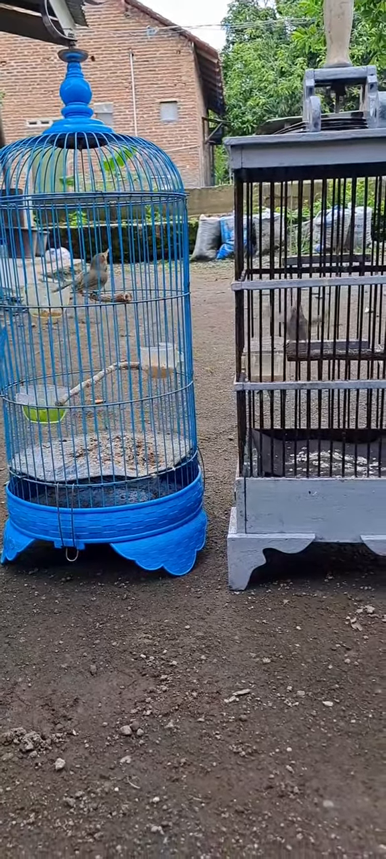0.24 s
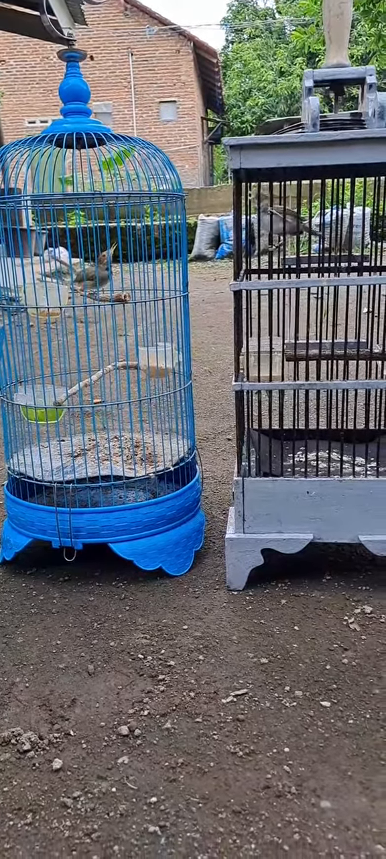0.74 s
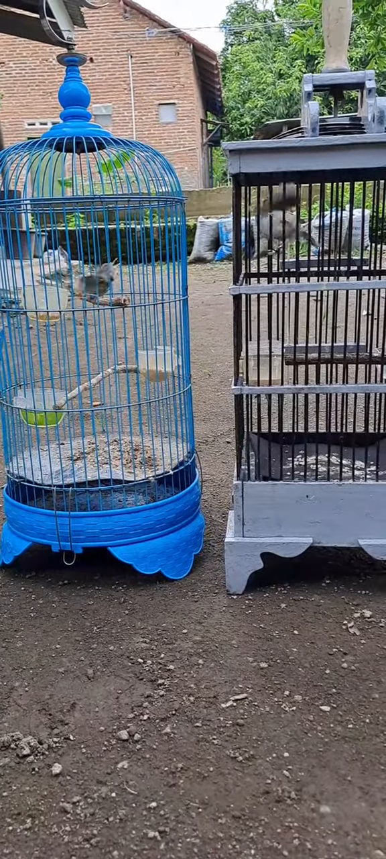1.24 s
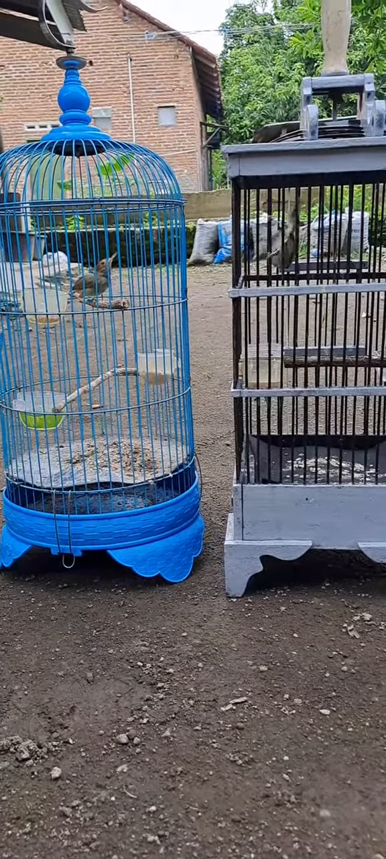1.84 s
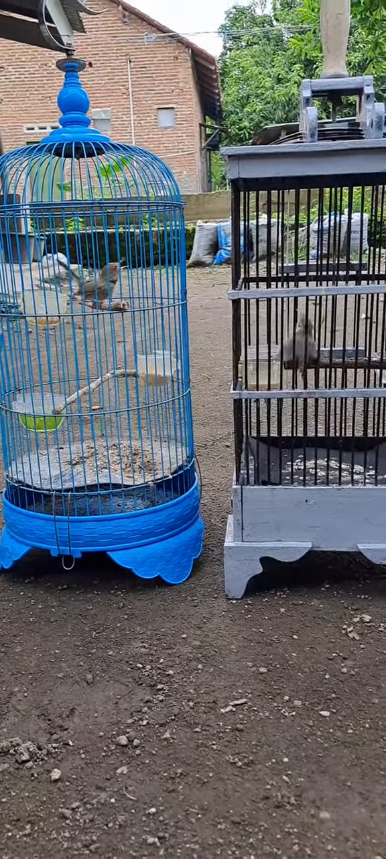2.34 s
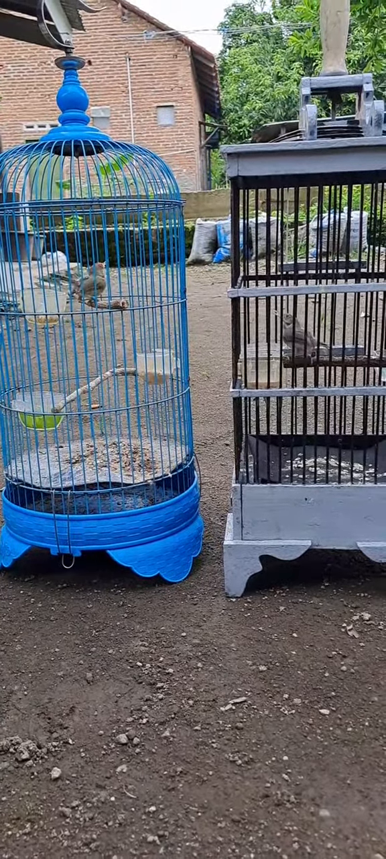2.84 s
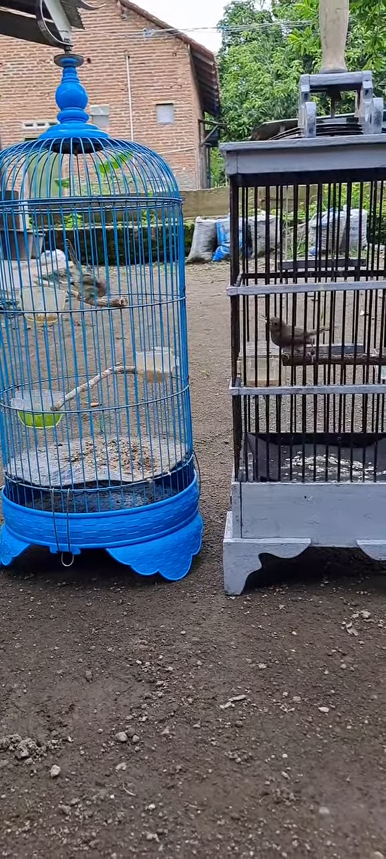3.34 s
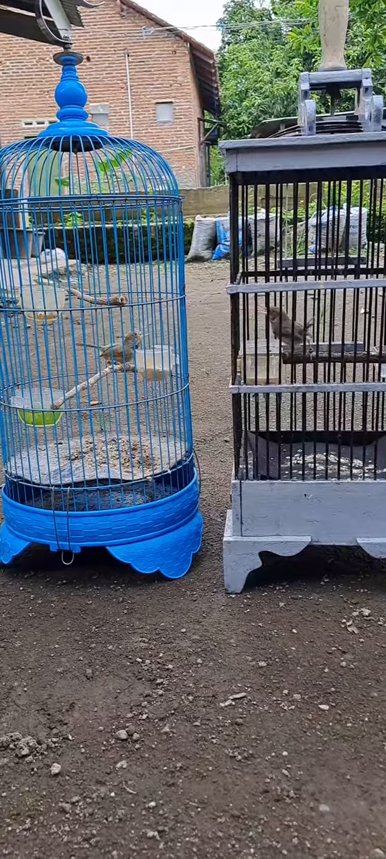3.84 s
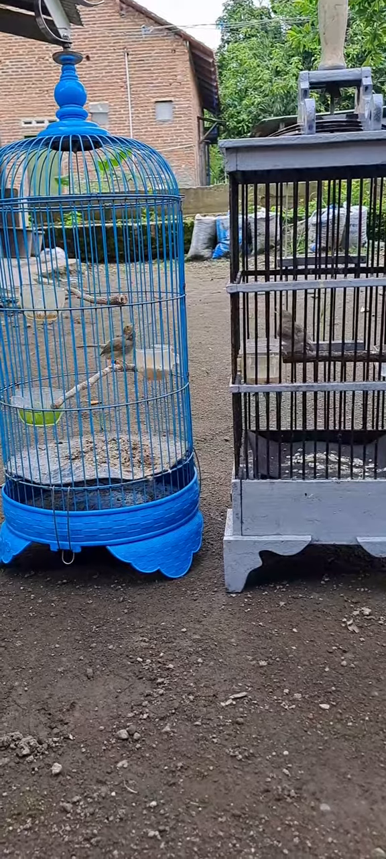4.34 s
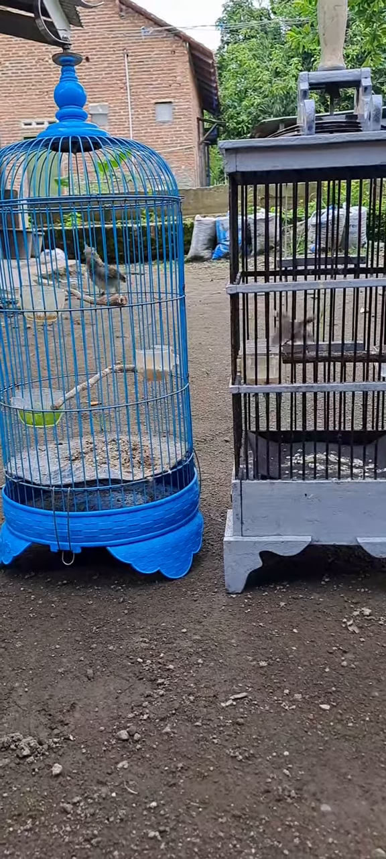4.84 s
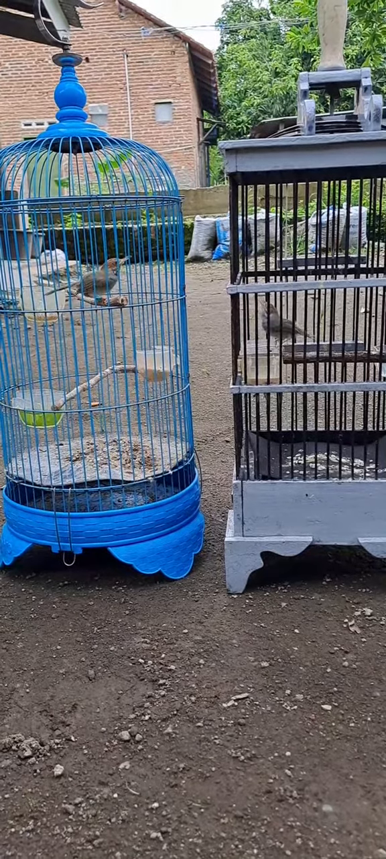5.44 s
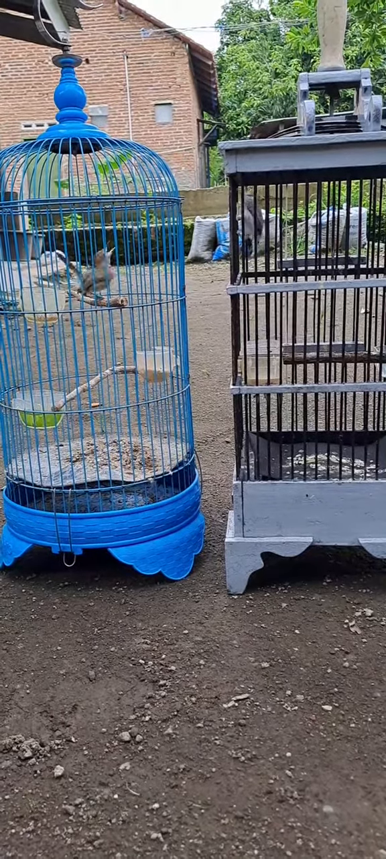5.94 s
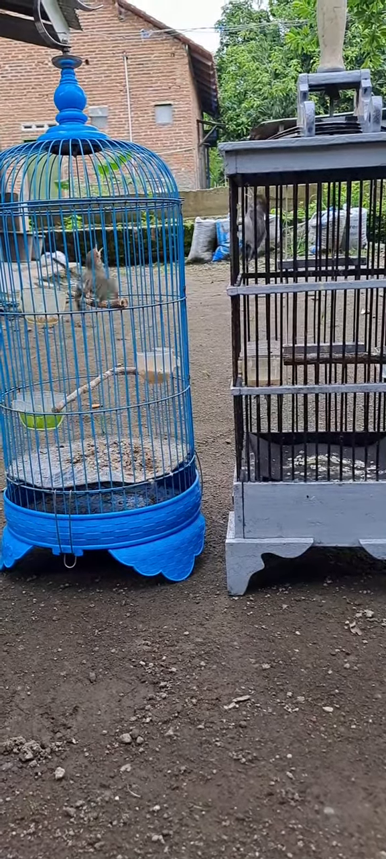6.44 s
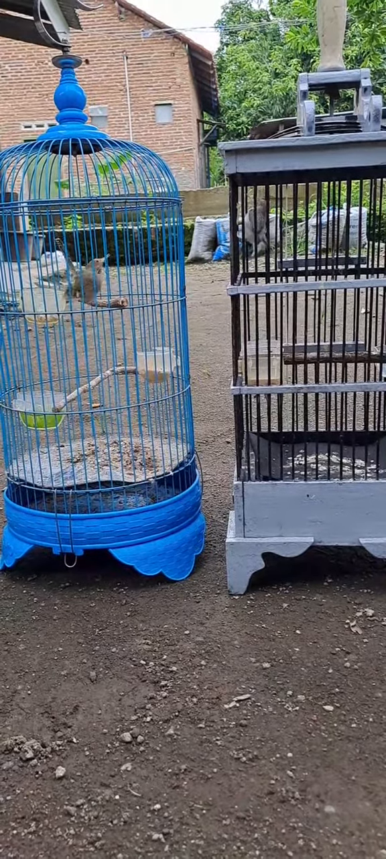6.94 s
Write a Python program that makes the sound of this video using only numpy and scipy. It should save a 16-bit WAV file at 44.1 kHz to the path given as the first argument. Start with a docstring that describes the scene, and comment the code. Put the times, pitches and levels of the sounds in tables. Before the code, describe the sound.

In an outdoor yard, two small songbirds sing loudly from cages near the microphone. One gives a rising-in-strength whistle, a high pip and a downward slur, six times over. The other replies with groups of quick chirps and dry trills that slow slightly. Wings flick faintly between phrases. Walls add a short echo, and a quiet far rumble runs underneath, joined later by a low hum.

```python
"""A thin whistle swells over a faint far rumble, then a high pip and a down-slur follow: a caged prinia
sings close by in a walled yard. A second answers with arched chirps and dry trills. Each note is an
oscillation of the syrinx, gliding in pitch; a faint hiss follows the song. Hoarse soft calls, a low peep
and wings snapping air through feathers fill the pauses. Brief tones and a low hum come from far away,
and the ground and walls reflect the song."""
import sys
import numpy as np
from scipy import signal
from scipy.fft import rfft, irfft
from scipy.io import wavfile
from scipy.ndimage import uniform_filter1d, minimum_filter1d

SR = 44100
rng = np.random.default_rng(int(sys.argv[2]) if len(sys.argv) > 2 else 0)


def inscribe(sig):
    """Save sig as 16-bit PCM at rate SR to the path in sys.argv[1].

    A 1-D sig is mono; a 2-D sig holds one channel per row.
    Samples are clipped to [-1, 1] before scaling.
    """
    pcm = np.round(np.clip(np.atleast_2d(sig).T, -1, 1) * 32767)
    wavfile.write(sys.argv[1], SR, pcm.astype(np.int16))


N = 317079

# whistles: (time [s], length [s], attack [dB], dip [dB], middle [dB], end [dB])
WHISTLES = [(-.17, 0.32, -22, -44, -26.5, -13.5), (1.241, 0.305, -13, -27.5, -23, -10),
            (2.371, 0.32, -9.5, -27, -22, -12), (3.87, 0.31, -13, -28, -23.5, -10.5),
            (4.949, 0.30, -7, -24, -17, -11), (6.13, 0.32, -10.5, -29, -28.5, -16)]
# note contours: (time from the note's anchor [ms], pitch [Hz], level [dB])
SOFT_LOWER_SHAPE = [(-42, 2700, -20), (-32, 3200, -6), (-22, 3750, -3), (-13, 4400, -1), (-2, 4680, 0),
                    (12, 4600, -1), (26, 4100, -1), (40, 3100, -9)]
SOFT_UPPER_SHAPE = [(-48, 4500, -25), (-40, 5500, -8), (-30, 6200, -7), (-15, 6700, -12), (0, 6900, -28)]
PIP_SHAPE = [(-1, 4800, -30), (2, 5010, -4), (6, 5105, 0), (12, 5135, 0), (16, 5125, -2), (22, 5080, -24)]
SLUR_SHAPE = [(-3, 4600, -30), (1.5, 4260, -3), (7, 3900, 0), (14, 3640, 0), (23, 3340, -10),
              (44, 2200, -21), (50, 1900, -38)]
PEEP_SHAPE = [(-25, 3000, -25), (-12, 3300, -2), (5, 3350, 0), (22, 3300, -3), (32, 3400, -15)]
# notes as sung: (time [s], level [dB], pitch [ratio], duration [ratio])
SOFT_CALLS = [(.108, -35, 1, 1.1), (1.005, -35, .97, .95), (1.196, -34, 1, 1), (1.432, -30, 1.035, .8),
              (2.868, -35, .98, 1), (3.113, -37, .985, 1), (3.315, -35, 1.025, .75)]
PIPS = [(.207, -10.5, 1, 1.05), (1.603, -6, 1, 1), (2.749, -12, 1, .95), (4.232, -11.5, 1.005, 1),
        (5.306, -13, 1, .95), (6.501, -11, 1.01, 1)]
SLURS = [(0.2386, -9, 0.97, 1.26), (1.635, -7, 0.97, 1.28), (2.7855, -7, 0.98, 1.1),
         (4.266, -3, 0.99, 1.02), (5.343, -7.5, 0.96, .98), (6.538, -6.5, 0.98, 0.99)]
ARCHES = [(0.65, -13, 1, 1.08), (0.8088, -12.5, 0.95, 1.09), (2.0331, -12, 0.94, .98),
          (2.198, -12.5, 0.93, 1.16), (2.3636, -12.5, 0.93, 1.2), (2.551, -13.5, 0.94, 1.116),
          (4.0888, -11.5, 0.95, 1.08), (4.2545, -12, 0.92, 1.18), (4.4519, -14.5, 0.94, 1.1),
          (5.226, -12.5, 0.96, 1.18), (5.3838, -17, 0.93, 1.1), (6.339, -13, 1, 0.97),
          (6.495, -13.5, 0.97, 1.09)]
PEEPS = [(.953, -36, 1, 0.82)]
# one trill note: (time from its top [ms], pitch [share of top], level [dB], closing tick [share])
TRILL_SHAPE = [(-12, .76, -24, 0), (-6, .93, -6, 0), (0, 1, 0, 0), (3, .97, -2, 0), (5, .91, -6, .4),
               (7.5, .8, 2, 1), (10, .68, -9, 1), (13, .56, -26, .6)]
# trills: (time [s], notes [count], first gap [ms], slowing [ms per note], first pitch [Hz],
# last pitch [Hz], glide lateness [exponent], first level [dB], last level [dB], closing tick [dB])
TRILLS = [(.5034, 6, 43.2, 1.2, 4050, 3600, 1.5, -24.5, -28.5, -5),
          (1.792, 13, 36.6, .95, 4220, 3650, 3.5, -19.5, -27, 0),
          (4.385, 12, 40.4, .88, 4150, 4450, 1.2, -27, -27.5, 6.5),
          (5.4436, 6, 41.3, 1.3, 3950, 3570, .4, -31, -28.5, -4),
          (6.6323, 4, 47, 1.5, 3620, 3520, 2, -29, -32.5, -2)]
# wing flutters: (time of strongest beat [s], level [dB], beats before [count], beats after [count])
FLUTTERS = [(.388, -30.5, 0, 1), (1.085, -37.5, 0, 1), (1.794, -34, 0, 1), (3.151, -30, 1, 0),
            (3.365, -33.5, 0, 0), (3.715, -38, 1, 1), (3.834, -35, 0, 1), (4.978, -35, 0, 0),
            (5.865, -54, 0, 0), (5.98, -36.5, 1, 1), (6.037, -35.5, 0, 1), (7.166, -36.5, 1, 1)]
# distant tones: (centre time [s], length [s], start pitch [Hz], end pitch [Hz], level [dB])
FAR_TONES = [(.31, .13, 725, 695, -57), (1.57, .14, 550, 590, -63), (2.64, .11, 470, 515, -52.5)]
# background envelopes: (time [s], level [dB])
RUMBLE_LEVELS = [(0, -47.5), (1.2, -45.5), (3.6, -47.5), (5.3, -45.5), (7.19, -46)]
HUM_LEVELS = [(0, -63.5), (4.3, -57.5), (5.002, -45.5), (7.19, -56)]
# spectral shapes: (frequency [Hz], relative level [dB])
OVERTONE_FILTER = [(3500, -18.5), (6000, -22.5), (6900, -23), (7800, 5), (9200, -4), (10700, -3),
                   (11500, -23), (12800, 1.5), (15500, -5)]
HISS_SPECTRUM = [(1000, -20.5), (2000, -6.5), (4000, 13.5), (6500, -8), (8000, 0.5), (11000, -24),
                 (13000, -9), (15000, -13)]
RUMBLE_SPECTRUM = [(13, -41.5), (22, -18.5), (64, 4.5), (108, -1.5), (144, 1), (176, -2.5), (310, -17.5),
                   (451, -20), (500, -20.5), (593, -23), (668, -25.5), (715, -16.5), (893, -26.5),
                   (1060, -36), (1300, -39.5), (1690, -76), (2860, -120)]
AIR_SPECTRUM = [(600, -5.5), (1200, 4.5), (2500, -1.5), (5000, -6), (9000, -10.5), (15000, -12.5)]
FEATHER_SPECTRUM = [(800, -16), (1800, -4), (3000, -8), (4500, 7.5), (7000, 3), (9000, -14.5),
                    (15000, -25.5)]
# likeness of left and right in the background: (frequency [Hz], coherence [0 to 1])
COHERENCE = [(30, 0.99), (130, 1), (300, 0.97), (700, 0.72), (1500, 0.13), (8000, 0.17)]
# first reflections from ground and wall: (left delay [ms], right delay [ms], level [dB])
ECHOES = [(2.71, 9, -15.5), (22.9, 33, -11)]


def from_db(db):
    """Amplitude grows tenfold for every 20 dB."""
    return 10 ** (np.asarray(db) / 20)


def unit_rms(x):
    """Normalisation to unit mean power."""
    return x / np.sqrt(np.mean(x ** 2) + 1e-20)


def at_hz(points, hz):
    """Interpolation on a logarithmic frequency axis."""
    knots_hz, value = np.transpose(points)
    return np.interp(np.log(hz + 1), np.log(knots_hz), value)


def colour(x, spectrum):
    """Linear filtering: each frequency is scaled by its own gain."""
    return irfft(rfft(x) * from_db(at_hz(spectrum, np.fft.rfftfreq(N, 1 / SR))), N)


def noise(spectrum):
    """Filtered white noise takes on the spectrum of the filter; unit rms."""
    return unit_rms(colour(rng.standard_normal(N), spectrum))


def diffuse_noise(spectrum):
    """A diffuse field is coherent between the ears in the bass and nearly unrelated in the treble."""
    hz = np.fft.rfftfreq(N, 1 / SR)
    coherence = np.clip(at_hz(COHERENCE, hz), 0, .995)
    mid, side = rfft(rng.standard_normal((2, N)))
    stereo = np.sqrt(1 + coherence) * mid + np.sqrt(1 - coherence) * side * [[1], [-1]]
    return unit_rms(irfft(stereo * from_db(at_hz(spectrum, hz)), N))


def drift(rate_hz):
    """Low-passed noise is a smooth random fluctuation; unit rms."""
    pole = np.exp(-2 * np.pi * rate_hz / SR)
    return unit_rms(signal.lfilter([1], [1, -2 * pole, pole * pole], rng.standard_normal(N)))


def add(track, start_s, sound):
    """Superposition: a sound sums into the track from its start time."""
    start = int(round(start_s * SR))
    lo, hi = max(start, 0), min(start + sound.shape[-1], N)
    if hi > lo:
        track[..., lo:hi] += sound[..., lo - start:hi - start]


def syrinx(hz, level_db, jitter=0):
    """A periodic oscillator gives harmonics (rows 1 to 3); random frequency modulation roughens them."""
    waver = unit_rms(uniform_filter1d(rng.standard_normal(len(hz)), size=30))
    phase = 2 * np.pi * np.cumsum(uniform_filter1d(hz, size=90) * (1 + jitter * waver)) / SR
    return from_db(level_db) * np.array([np.sin(phase), np.sin(2 * phase), np.sin(3 * phase)])


def sing(track, anchor_s, ms, hz, level_db, jitter):
    """Frequency and amplitude modulation along a contour adds one note to the track."""
    knots_s = ms / 1000
    t = np.arange(knots_s[0], knots_s[-1], 1 / SR)
    note = syrinx(np.interp(t, knots_s, hz), np.interp(t, knots_s, level_db), jitter)
    add(track, anchor_s + knots_s[0], note)


def notes(shape, events, jitter):
    """One learnt gesture repeats, scaled in amplitude, frequency and time."""
    ms, hz, shape_db = np.transpose(shape)
    track = np.zeros((3, N))
    for s, level_db, pitch, stretch in events:
        sing(track, s, ms * stretch, hz * pitch, level_db + shape_db, jitter)
    return track


def voice(partials, second_db, third_db, hiss_db, flicker_db):
    """Two rows: the fundamental, and overtones with a faint hiss that follows each note's loudness."""
    tone, second, third = partials * from_db(flicker_db * drift(120))
    envelope = np.sqrt(np.abs(uniform_filter1d(tone ** 2, size=88)))
    overtones = colour(from_db(second_db) * second + from_db(third_db) * third, OVERTONE_FILTER)
    return np.array([tone, overtones + from_db(hiss_db) * envelope * noise(HISS_SPECTRUM)])


def whistles(pitch_hz=3395, overshoot_hz=290, settle_s=.022, creep_hz=175):
    """A tone scoops up, settles, then swells and creeps higher; period doubling marks its thin middle."""
    scoop_from_hz, scoop_s, scoop_top_s = 1600, .0105, .005
    track = np.zeros((3, N))
    for s, length, attack_db, dip_db, middle_db, end_db in WHISTLES:
        times = [-.011, -.003, .001, .012, .03, .07, .17, length - .055, length - .018, length + .012]
        levels = [attack_db - 31.5, attack_db - 13.5, attack_db, attack_db, dip_db + 5, dip_db,
                  middle_db, (middle_db + end_db) / 2, end_db, end_db - 20.5]
        t = np.arange(times[0], times[-1], 1 / SR)
        before, after = np.minimum(t - scoop_top_s, 0), np.maximum(t - scoop_top_s, 0)
        held_hz = pitch_hz + overshoot_hz * np.exp(-after / settle_s) + creep_hz * (after / length) ** 3.2
        hz = scoop_from_hz + (held_hz - scoop_from_hz) * np.exp(-(before / scoop_s) ** 2)
        note = syrinx(hz, np.interp(t, times, levels))
        # a doubled period adds faint lines at 3/2 and 1/2 of the pitch
        half_phase = np.pi * np.cumsum(hz) / SR
        doubling = np.interp(t, [.015, .07, .19, .26], [0, 1, 1, 0])
        note[0] += doubling * (from_db(-49) * np.sin(3 * half_phase) + from_db(-62) * np.sin(half_phase))
        add(track, s + times[0], note)
    return voice(track, second_db=-48.5, third_db=-54.5, hiss_db=-47.5, flicker_db=1.33)


def far_rumble():
    """A diffuse field of low noise slowly rises and falls."""
    level_db = np.interp(np.arange(N) / SR, *np.transpose(RUMBLE_LEVELS)) - .6
    return from_db(level_db) * diffuse_noise(RUMBLE_SPECTRUM)


def far_hum(hum_hz=139, waver=.035, swell_db=2.5):
    """A low tone, as of a distant engine, grows under random amplitude and frequency modulation."""
    level_db = np.interp(np.arange(N) / SR, *np.transpose(HUM_LEVELS)) + swell_db * drift(5)
    hz = hum_hz * (1 + waver * drift(4))
    return from_db(level_db) * np.sin(2 * np.pi * np.cumsum(hz) / SR)


def soft_calls():
    """Biphonation: both sides of the syrinx oscillate at once, and the call sounds hoarse."""
    lower = notes(SOFT_LOWER_SHAPE, SOFT_CALLS, jitter=.016)
    upper = from_db(-10) * notes(SOFT_UPPER_SHAPE, SOFT_CALLS, jitter=.025)
    return voice(lower + upper, second_db=-14, third_db=-19.5, hiss_db=-12, flicker_db=-2.5).sum(axis=0)


def pips():
    """An almost periodic oscillation gives a brief, pure, high note."""
    partials = notes(PIP_SHAPE, PIPS, jitter=.00086)
    return voice(partials, second_db=-34, third_db=-33, hiss_db=-41.5, flicker_db=1.3)


def slurs():
    """A fast downward frequency sweep, roughened by jitter."""
    partials = notes(SLUR_SHAPE, SLURS, jitter=.018)
    return voice(partials, second_db=-45, third_db=-49, hiss_db=-25, flicker_db=3)


def far_tones():
    """Brief distant glides waver under random amplitude modulation."""
    track = np.zeros(N)
    for s, length, start_hz, end_hz, level_db in FAR_TONES:
        n = int(length * SR)
        phase = 2 * np.pi * np.cumsum(np.linspace(start_hz, end_hz, n)) / SR
        add(track, s - length / 2, from_db(level_db) * np.hanning(n) * np.sin(phase))
    return track * from_db(1.5 * drift(30))


def wings(beat_s=.0167, snap_s=.0016, loss_db_per_beat=6):
    """Flow noise: each wing stroke drives a brief snap of air through the feathers."""
    t = np.arange(-SR // 100, SR // 50) / SR
    snap = np.exp(-np.abs(t) / snap_s)
    strokes = np.zeros(N)
    for s, level_db, before, after in FLUTTERS:
        for k in range(-round(before), round(after) + 1):
            add(strokes, s + k * beat_s + t[0], from_db(level_db - loss_db_per_beat * abs(k)) * snap)
    return strokes * noise(FEATHER_SPECTRUM)


def trills(reference_hz=4250, tick_db_per_octave=60):
    """A slowing pulse train of pitch domes; the higher a note, the shorter it is and harder its tick."""
    ms, pitch_share, shape_db, tick_share = np.transpose(TRILL_SHAPE)
    track = np.zeros((3, N))
    for s, count, gap_ms, slowing_ms, first_hz, last_hz, lateness, first_db, last_db, tick_db in TRILLS:
        for k, progress in enumerate(np.linspace(0, 1, round(count))):
            top_s = s + k * (gap_ms + slowing_ms * (k - 1) / 2) / 1000
            top_hz = first_hz + (last_hz - first_hz) * progress ** lateness
            stretch = (reference_hz / top_hz) ** 3.7
            closing_db = tick_db + tick_db_per_octave * np.log2(top_hz / reference_hz)
            level_db = first_db + (last_db - first_db) * progress + shape_db + closing_db * tick_share
            sing(track, top_s, ms * stretch, top_hz * pitch_share, level_db, jitter=.014)
    return voice(track, second_db=-32, third_db=-44, hiss_db=-17, flicker_db=3)


def arched_chirps(foot_hz=1100, top_hz=5690, rise_ms=18, fall_ms=15.5, throat_hz=4200, beak_hz=3600):
    """Resonance: the pitch climbs and drops, and the chirp is loudest near the throat's own frequency."""
    ms = np.arange(-42, 34)
    from_top = np.abs(ms / np.where(ms < 0, rise_ms, fall_ms))   # 1 at half height
    hz = foot_hz + (top_hz - foot_hz) / (1 + from_top ** 2.2)
    octaves = np.log2(hz / throat_hz)
    throat_db = np.where(octaves < 0, -23, -34) * octaves ** 2
    beak_db = 3 * (np.exp(-(np.log2(hz / beak_hz) / .14) ** 2) - .5)   # a second, narrow resonance
    from_edge_ms = np.minimum(ms - ms[0], ms[-1] - ms)
    fade_db = 2.5 * np.maximum(0, 7 - from_edge_ms)
    sag_db = .0541 * ms   # the breath weakens through the note
    shape = np.transpose([ms, hz, throat_db + beak_db - fade_db - sag_db])
    partials = notes(shape, ARCHES, jitter=.003)
    return voice(partials, second_db=-28.5, third_db=-31, hiss_db=-32, flicker_db=2.5)


def peep():
    """A fundamental without harmonics gives one faint, plain note."""
    return notes(PEEP_SHAPE, PEEPS, jitter=.0066)[0]


def cage_echo(x, echo_db):
    """Interference: the delay of the cage floor's echo shifts as the bird moves, rippling the level."""
    delay_s = .002 + .00015 * drift(1)
    now = np.arange(N)
    echo = np.interp(now - delay_s * SR, now, x)
    gain = from_db(echo_db)
    return (x + gain * echo) / np.hypot(1, gain)


def early_paths(x, pan_db):
    """Direct sound, placed by level difference (positive is left), and its first reflections."""
    out = x * from_db(np.array([[pan_db], [-pan_db]]) / 2)
    for left_ms, right_ms, level_db in ECHOES:
        add(out[0], left_ms / 1000, from_db(level_db) * x)
        add(out[1], right_ms / 1000, from_db(level_db) * x)
    return out


def yard_response(wall_t60_s=.38, cage_t60_s=.15, cage_db=9, coherence=.33, onset_s=.0083, dense_s=.09):
    """Exponential decay, fast among the cages and slow between walls; lone echoes thicken to a wash."""
    t = np.arange(SR * 6 // 10) / SR
    decay = np.hypot(from_db(-60 * t / wall_t60_s), from_db(cage_db - 60 * t / cage_t60_s))
    envelope = decay * (1 - np.exp(-t / onset_s))
    density = np.clip((t / dense_s) ** 2, .02, 1)
    strengths = rng.standard_normal((3, len(t)))
    arrives = rng.random((3, len(t))) < density
    shared, left, right = strengths * arrives / np.sqrt(density)
    echoes = np.sqrt(coherence) * shared + np.sqrt(1 - coherence) * np.array([left, right])
    return echoes * envelope / np.linalg.norm(envelope)


def yard(x, step=8820):
    """Time-varying reverberation: the birds turn and hop, so the pattern of reflections keeps changing."""
    out = np.zeros((2, N))
    window = np.sin(np.pi * np.arange(2 * step) / (2 * step)) ** 1.5
    padded = np.pad(x, (step, 2 * step))
    for i in range(0, N + step, step):
        piece = padded[i:i + 2 * step] * window
        add(out, (i - step) / SR, signal.fftconvolve(piece[None], yard_response(), axes=1))
    return out


def scene():
    """Direct sound, reverberation and background superpose."""
    whistle, whistle_top = whistles()
    pip, pip_top = pips()
    slur, slur_top = slurs()
    arch, arch_top = arched_chirps()
    trill, trill_top = trills()
    calls = soft_calls() + peep()
    whistle, arch = cage_echo(whistle, echo_db=-16), cage_echo(arch, echo_db=-9)
    overtones = whistle_top + pip_top + slur_top + arch_top + trill_top
    wings_and_tones = wings() + far_tones()
    near = early_paths(whistle, pan_db=2.5) + early_paths(pip, pan_db=1.5) + early_paths(slur, pan_db=.9)
    near += early_paths(arch + from_db(-.5) * trill, pan_db=-1.3)
    near += early_paths(calls + wings_and_tones + from_db(-4.5) * overtones, pan_db=-2.5)
    # directivity: the notes are beamed differently, and the overtones arrive mostly by the walls
    to_walls = from_db(-8.5) * whistle + from_db(-14) * pip + from_db(-6.5) * slur
    to_walls += from_db(-4) * arch + trill
    to_walls += from_db(3.5) * calls + wings_and_tones + from_db(-1.5) * overtones
    return near + far_rumble() + yard(to_walls) + far_hum() + from_db(-69.5) * diffuse_noise(AIR_SPECTRUM)


def record(dry, ceiling=.85, cutoff_hz=16450):
    """Peak limiting holds the loudest notes under full scale; a steep low-pass removes the top."""
    allowed = np.minimum(1, ceiling / (np.abs(dry).max(axis=0) + 1e-9))
    gain = uniform_filter1d(minimum_filter1d(allowed, size=441), size=441)
    return signal.sosfiltfilt(signal.cheby2(14, 50, cutoff_hz, fs=SR, output="sos"), dry * gain)


dry = scene()
out = record(dry)
inscribe(out)
```